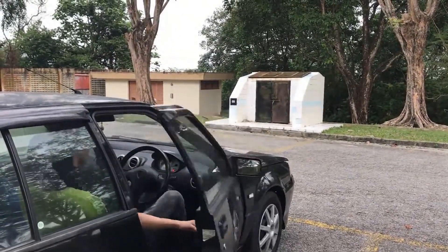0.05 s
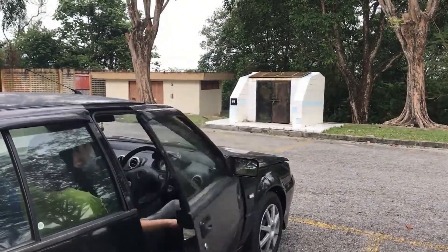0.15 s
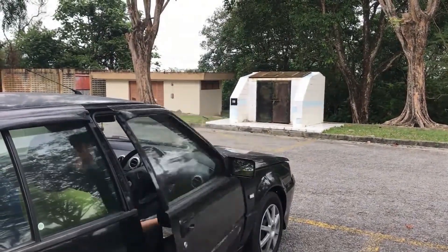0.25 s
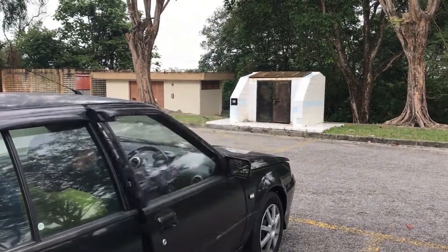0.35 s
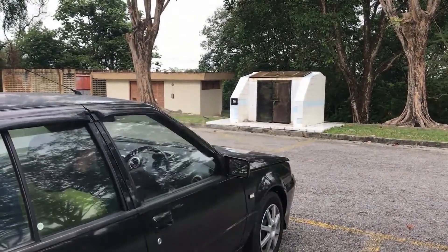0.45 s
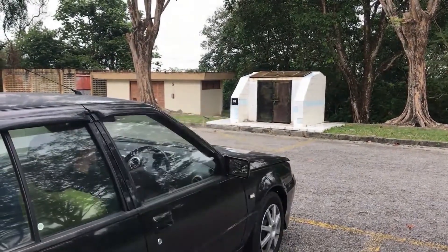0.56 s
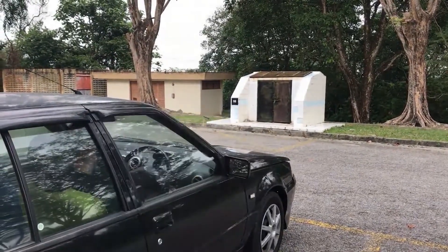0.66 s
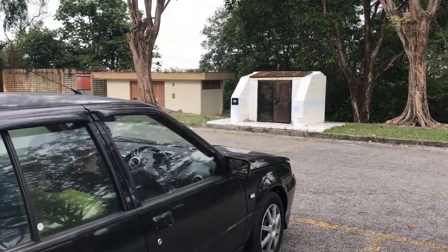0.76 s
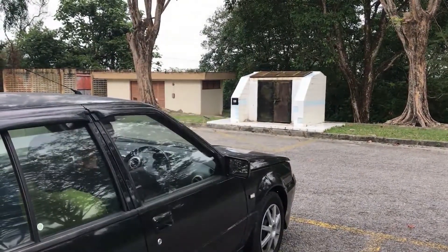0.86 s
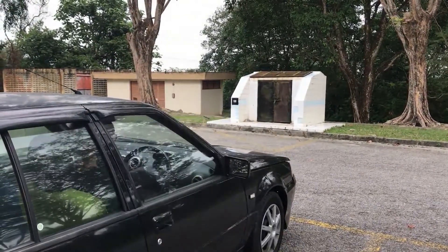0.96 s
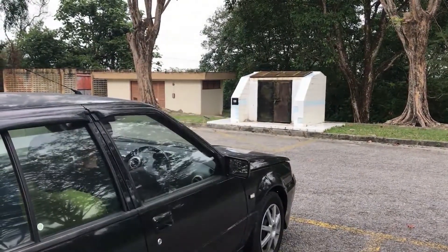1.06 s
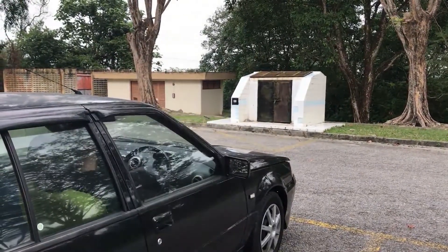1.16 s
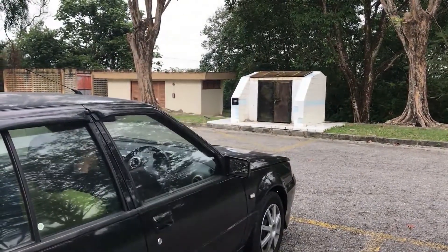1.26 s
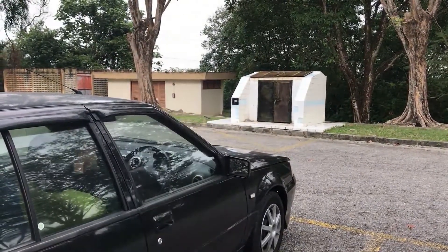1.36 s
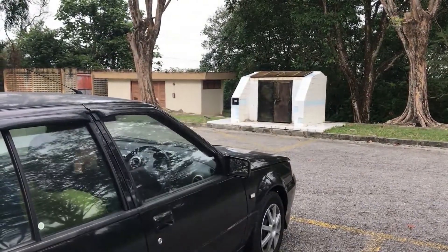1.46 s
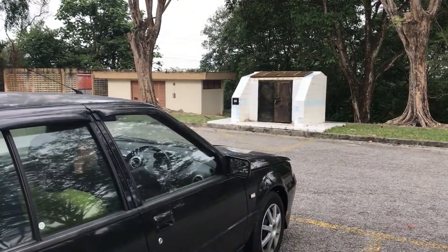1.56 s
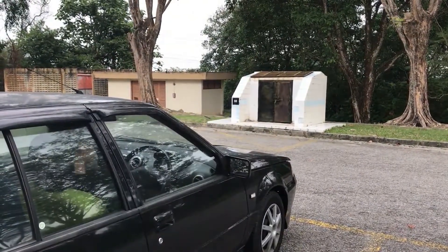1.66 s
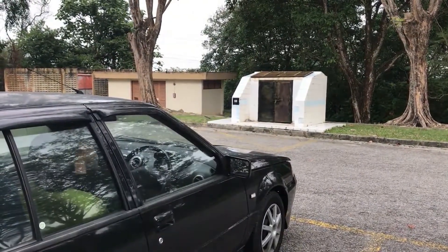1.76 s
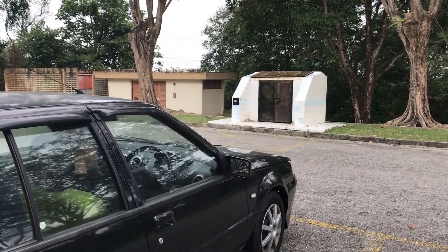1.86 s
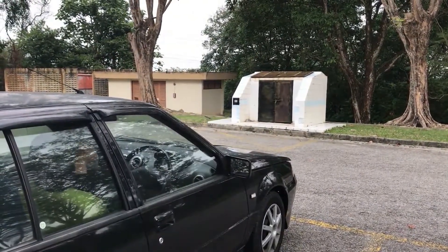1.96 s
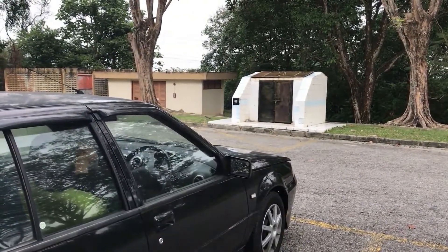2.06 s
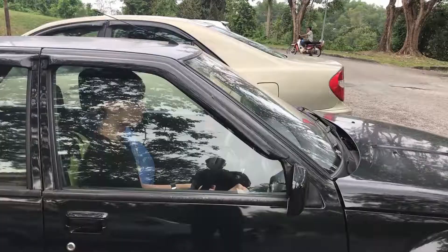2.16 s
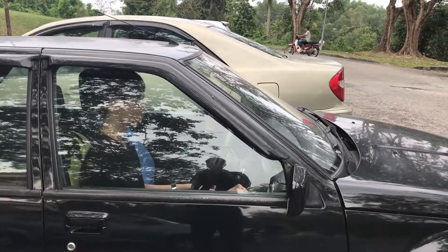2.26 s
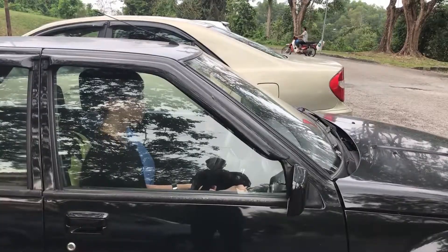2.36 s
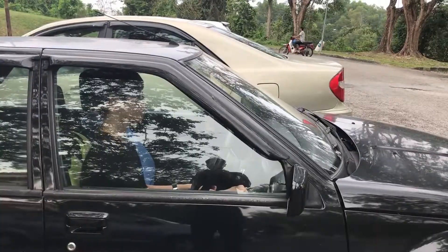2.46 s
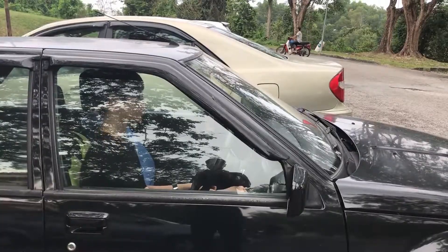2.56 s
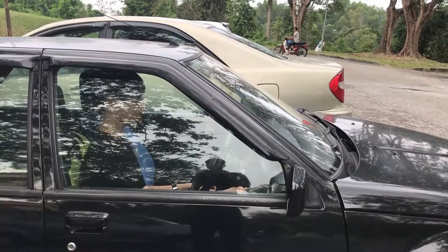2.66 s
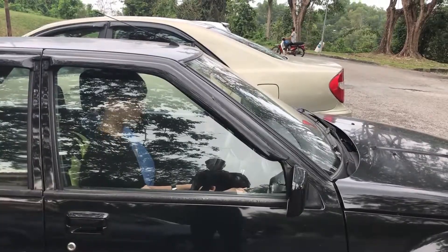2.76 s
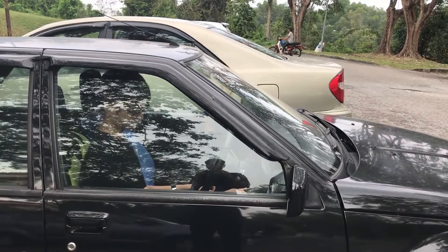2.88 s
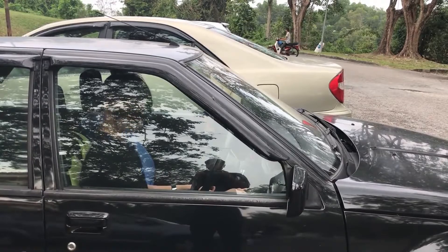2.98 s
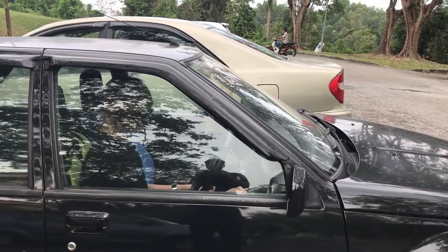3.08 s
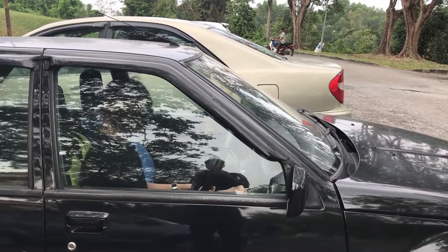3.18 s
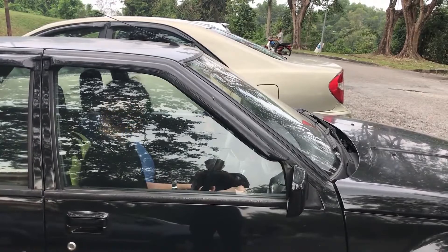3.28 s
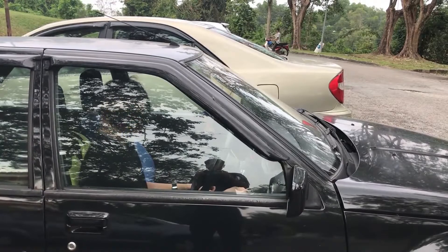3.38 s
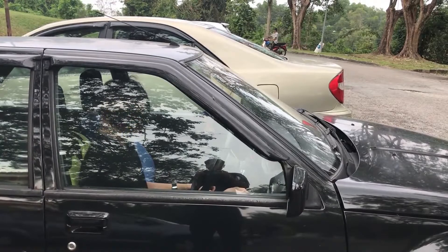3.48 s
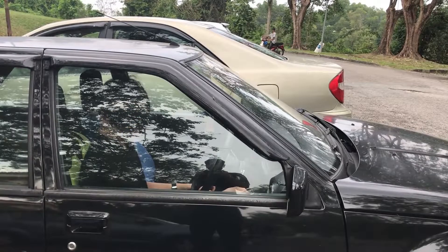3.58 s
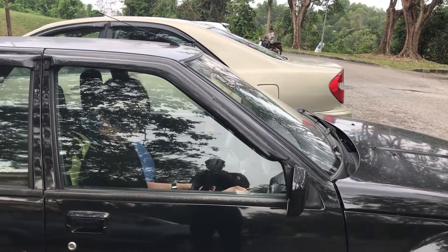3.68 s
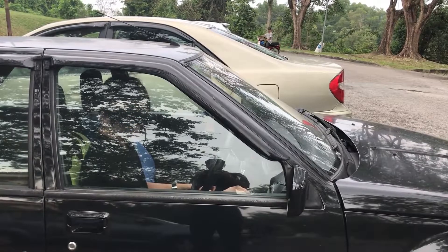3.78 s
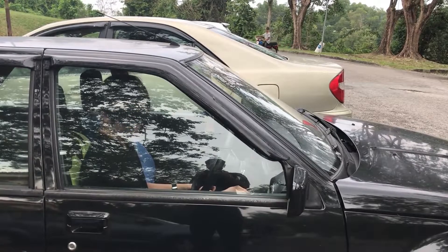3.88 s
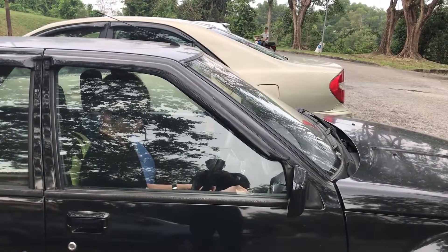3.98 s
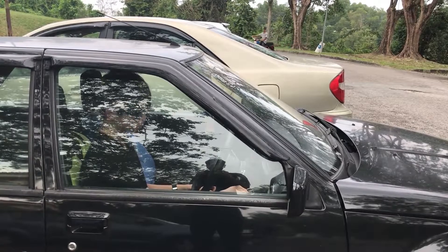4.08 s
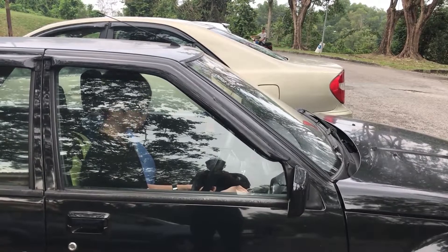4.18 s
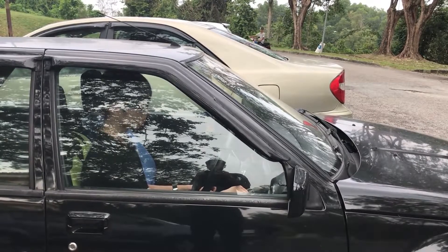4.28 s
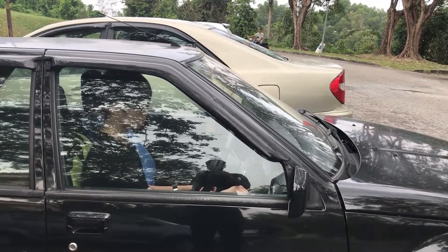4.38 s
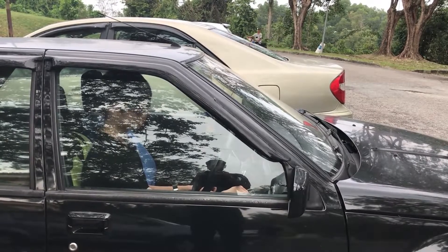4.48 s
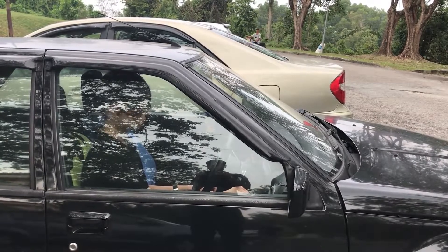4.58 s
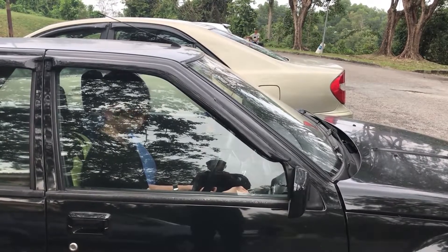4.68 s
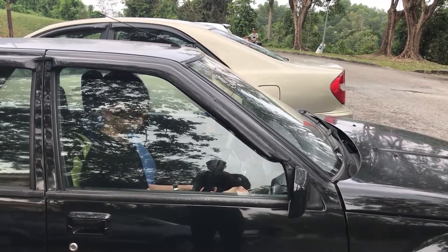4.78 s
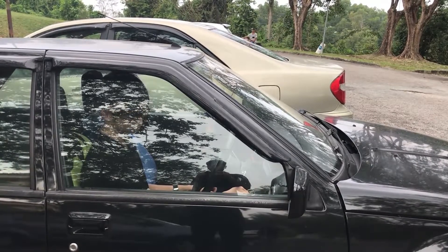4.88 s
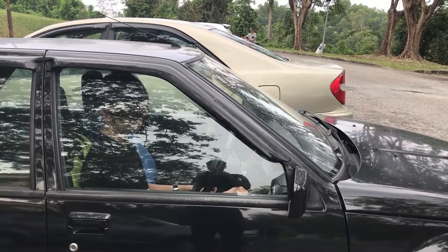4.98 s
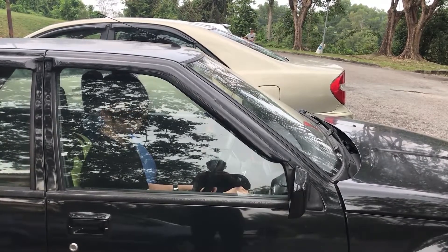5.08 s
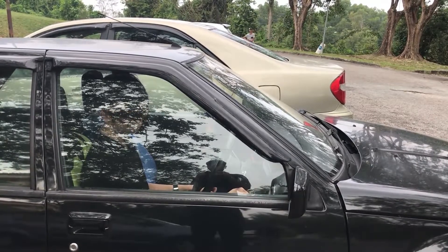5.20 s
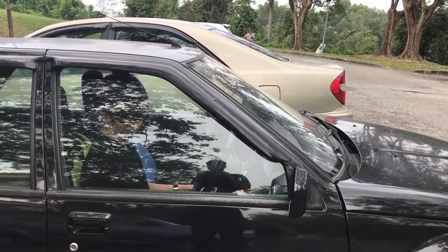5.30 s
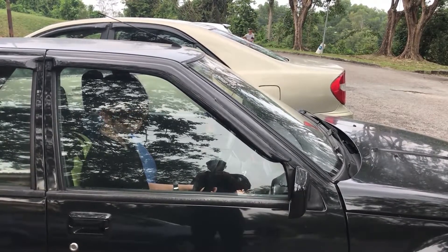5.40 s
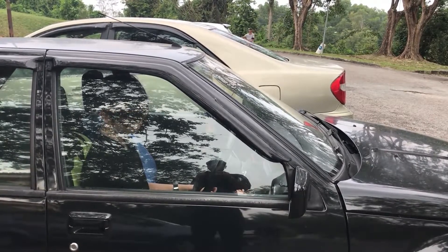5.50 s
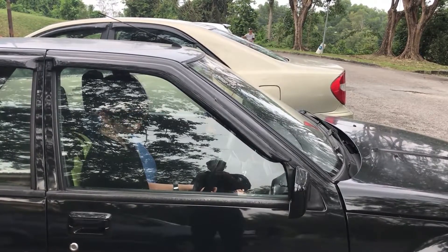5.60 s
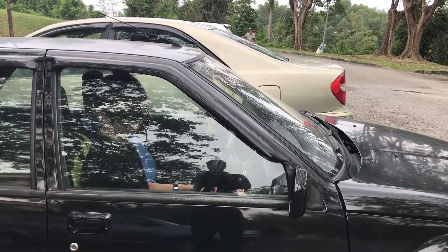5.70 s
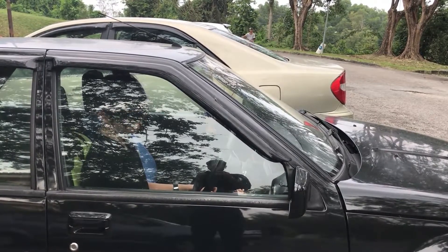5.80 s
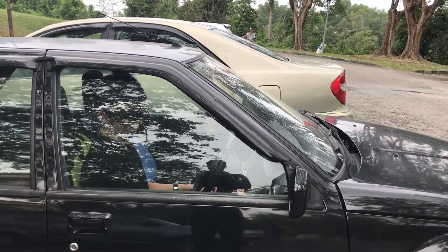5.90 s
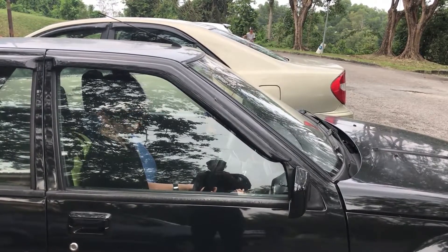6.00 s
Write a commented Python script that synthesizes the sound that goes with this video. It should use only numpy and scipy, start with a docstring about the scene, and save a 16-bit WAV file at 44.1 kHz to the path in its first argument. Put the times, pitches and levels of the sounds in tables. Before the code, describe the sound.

Close outdoor pickup beside a parked car, identical in both channels with little deep bass: one loud door slam early on, then a long quiet stretch of leaves, insects, chirping birds and a distant thudding motorcycle that revs and recedes. A thin electric pump hum and soft clicks come midway, and the starter finally engages with a clunk, gear whine and quickening exhaust thumps.

```python
"""A far motorcycle ticks over in thuds of a ringing silencer; a car door slams: metal crash, cabin boom, panel ring.
A breath of wind lifts the leaves (shaped noise) over traffic and insects; a bird chips in gliding tones.
The motorcycle revs, then idles while its rattle fades; the fuel pump whines, birds whistle and rasp, relays tick.
At last the starter clunks in and its gears whine over clatter and hiss; the engine catches in quickening thumps."""
import sys
import numpy as np
from scipy import signal
from scipy.fft import rfft, irfft, next_fast_len
from scipy.io import wavfile

SR = 44100
rng = np.random.default_rng(int(sys.argv[2]) if len(sys.argv) > 2 else 0)


def to_wav(s):
    """Save 16-bit WAV."""
    ch = np.atleast_2d(s).T  # columns
    pcm = np.round(np.clip(ch, -1, 1) * 32767)  # PCM
    wavfile.write(sys.argv[1], SR, pcm.astype(np.int16))


N = 266805

# Noise colours hold relative levels: the noise is scaled to unit rms before its level is set.
# Mode levels are relative to the hit that excites them; t60 is the time to fall by 60 dB.

# open air: (time [s], rumble level [dB], insect level [dB])
OPEN_AIR_LEVELS = [(0, -52, -74.3), (1.8, -51.7, -73.3), (2.4, -57, -75.5), (3.8, -54.7, -76),
                   (5.5, -55.8, -78)]
# colours of far rumble, traffic, leaves and insects: (frequency [Hz], relative density [dB])
RUMBLE_COLOUR = [(30, -13.5), (45, -3.5), (60, -1.5), (123, -5.5), (275, -15), (310, -23), (420, -28.5)]
TRAFFIC_COLOUR = [(300, -4), (540, -8), (780, -2.5), (1000, -6), (1300, -8), (2500, -18.5)]
LEAF_COLOUR = [(1500, -13.5), (2500, 3.5), (4000, 2.5), (5700, -4.5), (8000, -2.5), (10000, -10),
               (13000, -6), (15500, -8.5)]
INSECT_COLOUR = [(5800, -27), (6600, -1), (6900, 1), (7400, -13), (8600, -32.5)]
# tail scattered back by walls, trees and parked cars: (frequency [Hz], t60 [s])
YARD_TAIL_DECAY = [(150, 0.54), (600, 0.63), (2000, .42), (6000, 0.6), (14000, 0.59)]

# falling chips of one bird: (first [s], last [s], first [Hz], last [Hz], first [dB], last [dB])
CHIP_SERIES = (1.425, 2.118, 2890, 2780, -72, -68.5)
# slowly sinking trill of another: (first [s], last [s], first [Hz], last [Hz], first [dB], last [dB])
TRILL_SERIES = (3.168, 4.131, 3840, 3750, -58.5, -60)
# long whistle ahead of the trill: (start [s], length [s], target pitch [Hz], level [dB])
LONG_WHISTLE = (2.925, .175, 3940, -57.5)
# stray peeps: (start [s], target pitch [Hz], level [dB])
STRAY_PEEPS = [(3.805, 2190, -65.5), (3.875, 2170, -66.5), (4.412, 1920, -69), (4.555, 2910, -67),
               (4.638, 2330, -65), (4.67, 2880, -69), (4.75, 3410, -67.5), (4.82, 2850, -69),
               (4.9, 2800, -70)]
# glides within a note: (scoop up [Hz], scoop time constant [s], sag [Hz per s])
CHIP_GLIDE = (40, .01, 6000)
LONG_WHISTLE_GLIDE = (520, .026, 900)
TRILL_GLIDE = (720, .0105, 2300)
PEEP_GLIDE = (400, .008, 1500)
# raspy calls: (middle [s], half length [s], centre frequency [Hz], level [dB])
RASPY_CALLS = [(3.052, .045, 3160, -68), (3.08, .11, 4200, -77), (3.3, .12, 3100, -77),
               (3.516, .069, 3000, -68), (4.0, .22, 3200, -77), (4.37, .06, 4560, -78),
               (4.517, .06, 3930, -77.5), (4.66, .1, 2900, -77), (4.696, .04, 5500, -75),
               (5.205, .076, 7480, -66.5)]

# motorcycle silencer: (frequency [Hz], level [dB], t60 [s])
SILENCER_MODES = [(50, -14, 0.13), (80, 0, 0.17), (122, 4.5, 0.11), (160, 0, 0.12), (231.6, -8, 0.15),
                  (437, -22.5, 0.043)]
# motorcycle's mechanical noise: (frequency [Hz], relative density [dB])
RATTLE_COLOUR = [(150, 3), (260, 5), (400, -2.5), (600, -3.5), (690, -4), (765, 4), (900, -2), (1150, -1),
                 (1500, -6), (2300, -13), (3600, -15), (5200, -26), (8000, -24), (15000, -28.5)]

# fuel pump whine: (time [s], frequency [Hz], level [dB])
PUMP_WHINE = [(2.8, 1120, -90), (2.9, 1106, -72), (3.0, 1086, -66.5), (3.3, 1084, -68.5),
              (3.55, 1092, -69.5), (3.6, 1070, -93)]
# small knocks, key and relays: (time [s], level [dB], rise time constant [s], brightness [dB per octave])
CABIN_TICKS = [(.044, -58, .006, 0.5), (1.269, -63, 0.0018, 6), (2.209, -58.5, .0005, 0.5),
               (3.591, -52.5, 0.0011, -4.5), (3.665, -58.5, .003, -2), (3.688, -51, 0.0036, 18.5),
               (3.713, -52, .003, -4), (4.331, -63, .0005, -6)]
# colour of those ticks: (frequency [Hz], relative density [dB])
CABIN_TICK_COLOUR = [(250, -14), (800, 0.5), (1400, -1), (3000, -4.5), (6000, -10), (15000, -30)]
# their dying away: (frequency [Hz], t60 [s])
CABIN_TICK_DECAY = [(300, 0.17), (10000, 0.17)]
# a soft knock in the cabin: (time [s], level [dB])
SOFT_KNOCK = [(4.332, -49)]
# its body: (frequency [Hz], level [dB], t60 [s])
SOFT_KNOCK_MODES = [(400, -6, .03), (540, -2, .04)]

# colours of belts and valves, and of intake air: (frequency [Hz], relative density [dB])
CLATTER_COLOUR = [(180, 4), (460, -15), (620, -10.5), (770, -17.5), (1000, -2), (1200, -12.5), (1410, -4.5),
                  (1530, -11.5), (1800, -7.5), (2500, -20.5)]
INTAKE_COLOUR = [(1350, -39), (2300, -14), (2610, -11), (3320, 2.5), (4390, -5), (4720, -2), (4910, -7.5),
                 (6140, -3), (7680, -17.5), (8860, -10.5), (10200, -19), (11500, -16), (15500, -27)]
# car exhaust: (frequency [Hz], level [dB], t60 [s])
EXHAUST_MODES = [(42, -20, 0.13), (82, 1.5, 0.12), (113, -2, 0.11), (160, -21, 0.14)]
# unfired cylinders pump air into the exhaust: (time [s], level [dB])
AIR_PUFFS = [(5.686, -39), (5.792, -40)]

# solenoid, pinion meshing and pinion thrown out:
# (time [s], level [dB], rise time constant [s], brightness [dB per octave], ring of the part [Hz])
STARTER_CLUNKS = [(5.524, -35.5, .006, -0.5, 1103), (5.5806, -33.5, 0.00027, 0.5, 11700),
                  (5.597, -27.5, 0.0045, -1, 1013), (5.608, -36, 0.0024, -5.5, 354),
                  (5.804, -31, 0.0015, 1, 7160), (5.815, -35, 0.0023, 2, 1000)]
# colour of the clunks: (frequency [Hz], relative density [dB])
CLUNK_COLOUR = [(88, -43), (150, -9), (308, -3.5), (540, -27), (1040, 1.5), (1320, -6), (1630, -7.5),
                (1800, -5), (2810, -11.5), (3220, -3.5), (4840, -10.5), (7270, -13), (8170, -18.5),
                (13500, -22), (15500, -29)]
# their dying away: (frequency [Hz], t60 [s])
CLUNK_DECAY = [(250, 0.28), (1000, 0.16), (4000, 0.12), (12000, 0.12)]
# starter housing: (frequency [Hz], level [dB], t60 [s])
HOUSING_MODES = [(73, -9, 0.15), (242, -7.5, 0.15), (750, -15, 0.18), (1105, -9, 0.092), (3380, -14, .06),
                 (5400, -7, 0.054)]
# starter motor: (time [s], gear mesh frequency [Hz], level [dB])
GEAR_MESH = [(5.59, 268, -85), (5.62, 272.3, -46), (5.66, 276.3, -41.5), (5.70, 280.6, -36.3),
             (5.74, 273.2, -47), (5.79, 267, -49), (5.85, 287.2, -46), (6.05, 304.3, -50.5)]
# partials of the gear whine: (multiple of mesh frequency, level [dB])
GEAR_PARTIALS = [(1, -5), (2, -10.5), (2.65, -10.5), (4.05, -10), (5, -3.5), (10.4, -10), (14.2, -9),
                 (18.6, -9.5)]

# latch and door frame meeting the body:
# (time [s], level [dB], rise time constant [s], brightness [dB per octave])
LATCH_HITS = [(.5558, -20.5, 0.0025, 0), (.567, -24.5, .001, 1.5), (.572, -21, .001, 0.5),
              (.5785, -20.5, .001, 0), (.592, -27, .003, 0.1), (.611, -36.5, .002, -4),
              (.634, -37.5, .001, -1.5)]
# colour of the latch crash: (frequency [Hz], relative density [dB])
LATCH_COLOUR = [(150, -1), (200, -12.5), (260, -4.5), (450, -9.5), (740, -9), (930, -17), (1120, -3),
                (1350, -9), (2230, -10), (2550, -15), (5230, -19), (7860, -25.5), (9000, -23),
                (15500, -26.5)]
# its dying away: (frequency [Hz], t60 [s])
LATCH_DECAY = [(200, 0.33), (700, 0.15), (2000, 0.1), (6000, 0.12), (14000, 0.057)]
# latch and window frame: (frequency [Hz], level [dB], t60 [s])
LATCH_MODES = [(649, -17, 0.15), (1069, -10, .13), (1129, -17, .13), (1236, -14, 0.27), (1277, -3.5, .12),
               (1480, -14, 0.27), (1536, -11.5, .11), (1624, -17, .11), (1977, -23, 0.066),
               (2156, -10.5, .09)]
# the seal stops the door and the cabin air is squeezed: (time [s], level [dB])
AIR_PUSHES = [(.577, -23), (.592, -11.5)]
# cabin air and ringing body panels: (frequency [Hz], level [dB], t60 [s])
CABIN_MODES = [(46.6, -8.5, 0.43), (80, -0.5, 0.18), (120, -4.5, 0.038), (153.6, -13.5, .2)]
PANEL_MODES = [(260, -22.5, 0.82), (431, -31, .75), (463, -37, 1.8), (536, -36, 1.36), (733, -32.5, 1.27),
               (780, -33, 0.9), (870, -33.5, .8), (910, -35, .8)]

# a breath of wind lifts the leaves and the traffic noise
TRAFFIC_DB, LEAVES_DB = -71.3, -74.6
GUST_S, GUST_HALF_S, GUST_LEAVES_DB, GUST_TRAFFIC_DB = 1.56, .22, 5.5, 5
# birds: note counts and lengths, wavering of pitch and level, one reflection of the trill
CHIP_COUNT, CHIP_S, TRILL_COUNT, TRILL_NOTE_S, PEEP_S = 9, .048, 8, .056, .032
FLUTTER_PER_S, FLUTTER_HZ, FLUTTER_DB = 150, 16, 1.5
WALL_ECHO_S, WALL_ECHO_DB = .056, -14
RASP_HALF_WIDTH_HZ = 450
# motorcycle: ticks over, is suddenly heard revving, then settles to idle and rolls away
TICKOVER_START_S, REV_START_S, REV_END_S, SETTLE_S = .046, 2.217, 2.643, .165
TICKOVER_PER_S, REV_PER_S, IDLE_PER_S = 13.05, 16.45, 11.5  # firings a second
TICKOVER_DB, IDLE_DB, REV_GAIN_DB = -48.8, -51.8, 5.3  # thud strength ahead of the distance filter
RATTLE_DB, RATTLE_REV_GAIN_DB, RECEDE_DB_PER_S = -61.3, 4, 4.3
# engine noise while cranked and once it runs by itself
CRANKING_CLATTER_DB, CRANKING_HISS_DB = -43, -41.5
RUNNING_CLATTER_DB, RUNNING_HISS_DB = -38.3, -37
SPIN_UP_S = .15  # the intake draws air ever harder after the starter engages
COMPRESSION_S, COMPRESSION_HALF_S, COMPRESSION_DIP_DB = 5.785, .025, 4  # first compression stroke
CATCH_S, CATCH_RISE_S = 5.8605, .03  # first firing; the running noise comes up just ahead of it
CATCH_PER_S, REV_UP_PER_S2, FIRING_COUNT = 22.4, 98, 6  # firing rate at the catch, its acceleration
FLARE_S, FLARE_DB, FLARE_FALL_DB_PER_S = 5.93, -23.5, 60  # firings peak here, weaker before and after
PIPE_ECHO_S, PIPE_ECHO_DB = .014, -10  # each kick comes back from the end of the pipe
BASS_CUT_HZ, TOP_CUT_HZ = 38, 15850


def from_db(db):
    """Decibels to gain."""
    return 10 ** (np.asarray(db) / 20)


def rms_one(x):
    """Scale to unit rms."""
    return x / np.sqrt(np.mean(x ** 2) + 1e-20)


def in_time(rows):
    """Each column of a curve, sample by sample."""
    s, *columns = np.transpose(rows)
    return [np.interp(np.arange(N) / SR, s, column) for column in columns]


def at_hz(points, hz):
    """Read a table on a log-frequency axis."""
    known_hz, values = np.transpose(points)
    return np.interp(np.log(hz), np.log(known_hz), values)


def drift(rate):
    """Random wander of unit rms, drawn at so many points a second and joined by straight lines."""
    points = rng.standard_normal(N // 10)
    return rms_one(np.interp(np.arange(N) / SR * rate, np.arange(N // 10), points))


def swell(middle_s, half_s):
    """A smooth bell-shaped rise to 1 and fall again."""
    return np.exp(-((np.arange(N) / SR - middle_s) / half_s) ** 2)


def noise(colour):
    """Noise of rms 1 with the given colour, falling steeply beyond its ends."""
    size = next_fast_len(N)
    hz = np.maximum(np.fft.rfftfreq(size, 1 / SR), 1)
    low_skirt = np.minimum(hz / colour[0][0], 1) ** 4
    high_skirt = np.minimum(colour[-1][0] / hz, 1) ** 6
    white = rfft(rng.standard_normal(size))
    return rms_one(irfft(white * from_db(at_hz(colour, hz)) * low_skirt * high_skirt, size)[:N])


def struck(hits, modes, scatter_db):
    """Every hit sets decaying modes ringing, each with a randomly scattered strength."""
    out, t = np.zeros(N + SR), np.arange(SR) / SR
    hz, mode_db, t60 = np.transpose(modes)
    rings = np.sin(2 * np.pi * hz[:, None] * t) * from_db(-60 * t / t60[:, None])
    for s, db, *_ in hits:
        at = int(s * SR)
        strength_db = db + mode_db + scatter_db * rng.standard_normal(len(hz))
        out[at:at + SR] += from_db(strength_db) @ rings
    return out[:N]


def dying_noise(colour, decay):
    """One second of noise scaled to rms 1, then split into 12 bands that each die at their own rate."""
    t, hz = np.arange(SR) / SR, np.maximum(np.arange(SR // 2 + 1), 1)
    spectrum = rfft(rng.standard_normal(SR)) * colour(hz)
    spectrum /= np.std(irfft(spectrum, SR))
    edges = np.geomspace(60, 17000, 13)
    out = np.zeros(SR)
    for low, high in zip(edges, edges[1:]):
        band = irfft(spectrum * (hz >= low) * (hz < high), SR)
        out += band * from_db(-60 * t / at_hz(decay, np.sqrt(low * high)))
    return out


def crashes(hits, colour, decay, grain_db):
    """Contacts of loose metal parts: each swells, rattles and dies away as noise."""
    out, t = np.zeros(N + SR), np.arange(SR) / SR
    for s, db, rise, tilt, *_ in hits:
        burst = dying_noise(lambda hz: from_db(at_hz(colour, hz) + tilt * np.log2(hz)) * (hz > 100), decay)
        at = int(s * SR)
        lead = min(at, SR // 20)
        out[at:at + SR] += from_db(db) * burst
        # the swell ahead of the hit is the burst's opening, mirrored
        mirrored = (burst[:lead] * np.exp(-t[:lead] / abs(rise)))[::-1]
        out[at - lead:at] += from_db(db) * mirrored
    return out[:N] * from_db(grain_db * drift(900))


def echoed(x, lag_s, echo_db):
    """A sound with one delayed, scaled reflection."""
    t = np.arange(N) / SR
    return x + from_db(echo_db) * np.interp(t - lag_s, t, x)


def yard(x, wet_db, dull_hz):
    """Walls, trees and parked cars scatter a dull tail back, by convolution with dying noise."""
    build_up = 1 - np.exp(-np.arange(SR) / SR / .015)
    tail = dying_noise(lambda hz: 1 / np.hypot(1, hz / dull_hz), YARD_TAIL_DECAY) * build_up
    return x + from_db(wet_db) * signal.fftconvolve(x, tail / np.linalg.norm(tail))[:N]


def outdoors():
    """Broad noise bands for distant traffic, leaves stirred by one gust, and insects."""
    rumble_db, insects_db = in_time(OPEN_AIR_LEVELS)
    gust = swell(GUST_S, GUST_HALF_S)
    traffic_db = TRAFFIC_DB + GUST_TRAFFIC_DB * gust + 0.61 * drift(60)
    rumble = from_db(rumble_db) * noise(RUMBLE_COLOUR)
    traffic = from_db(traffic_db) * noise(TRAFFIC_COLOUR)
    leaves = from_db(LEAVES_DB + GUST_LEAVES_DB * gust) * noise(LEAF_COLOUR)
    insects = from_db(insects_db + 0.67 * drift(30)) * noise(INSECT_COLOUR)
    return rumble + traffic + leaves + insects


def whistles(notes, glide):
    """Each note (start, length, pitch, level) is a sine that scoops up, then sags, wavering a little."""
    out = np.zeros(N)
    scoop_hz, scoop_s, sag_hz_per_s = glide
    flutter = FLUTTER_HZ * drift(FLUTTER_PER_S)
    for s, length, top_hz, db in notes:
        t = np.arange(int(length * SR)) / SR
        span = slice(int(s * SR), int(s * SR) + len(t))
        hz = top_hz - scoop_hz * np.exp(-t / scoop_s) - sag_hz_per_s * t + flutter[span]
        tone = np.sin(2 * np.pi * np.cumsum(hz) / SR)
        out[span] += from_db(db) * np.sin(np.pi * t / length) * tone
    return out * from_db(FLUTTER_DB * drift(FLUTTER_PER_S))


def even_run(run, length_s, count):
    """Evenly spaced notes whose pitch and level slide from the first to the last."""
    s, hz, db = (np.linspace(first, last, count) for first, last in zip(run[::2], run[1::2]))
    return zip(s, np.full(count, length_s), hz, db)


def rasps():
    """Raspy calls: swelling bursts of noise in a narrow band."""
    out, t = np.zeros(N), np.arange(N) / SR
    for s, half, hz, db in RASPY_CALLS:
        near = abs(t - s) < 4 * half
        edges = [hz - RASP_HALF_WIDTH_HZ, hz + RASP_HALF_WIDTH_HZ]
        band = signal.butter(3, edges, "band", fs=SR, output="sos")
        rasp = rms_one(signal.sosfilt(band, rng.standard_normal(N)[near]))
        out[near] += from_db(db) * swell(s, half)[near] * rasp
    return out


def birds():
    """Gliding tones make chips, a trill and stray peeps among the trees; noise bursts make rasps."""
    chips = whistles(even_run(CHIP_SERIES, CHIP_S, CHIP_COUNT), CHIP_GLIDE)
    trill = whistles([LONG_WHISTLE], LONG_WHISTLE_GLIDE)
    trill = trill + whistles(even_run(TRILL_SERIES, TRILL_NOTE_S, TRILL_COUNT), TRILL_GLIDE)
    peeps = whistles([(s, PEEP_S, hz, db) for s, hz, db in STRAY_PEEPS], PEEP_GLIDE)
    wetter = yard(echoed(trill, WALL_ECHO_S, WALL_ECHO_DB) + rasps(), wet_db=-5, dull_hz=5000)
    return wetter + yard(chips + peeps, wet_db=-8, dull_hz=5000)


def motorcycle():
    """One cylinder thuds in its silencer; the throttle raises rate, strength and rattle together."""
    t = np.arange(N) / SR
    riding = t >= REV_START_S
    throttle = riding * np.exp(-np.maximum(t - REV_END_S, 0) / SETTLE_S)
    rate = IDLE_PER_S + (REV_PER_S - IDLE_PER_S) * throttle
    cycles = np.cumsum(rate[riding]) / SR
    ticking = np.arange(TICKOVER_START_S, REV_START_S - 1 / TICKOVER_PER_S, 1 / TICKOVER_PER_S)
    # one firing each time the cycle count passes a whole number
    fired = np.append(ticking, np.interp(np.arange(cycles[-1]), cycles, t[riding]))
    thud_db = np.where(riding, IDLE_DB + REV_GAIN_DB * throttle, TICKOVER_DB)
    thuds = struck(zip(fired, np.interp(fired, t, thud_db)), SILENCER_MODES, scatter_db=2.0)
    # distance rounds the thuds off and takes their depth
    distance = signal.butter(2, (62, 330), "band", fs=SR, output="sos")
    thuds = signal.sosfilt(distance, thuds)
    # each firing also lets out a short puff of gas
    since_firing = abs(t - fired[np.searchsorted(fired, t) - 1])
    puffs = rms_one(1 + .75 * np.exp(-since_firing / 0.0068))
    rattle_db = RATTLE_DB + RATTLE_REV_GAIN_DB * throttle - RECEDE_DB_PER_S * (t - REV_START_S)
    rattle = from_db(rattle_db + .6 * drift(60)) * noise(RATTLE_COLOUR)
    return thuds + riding * puffs * rattle


def ignition():
    """Key and relays tick as noise bursts; the fuel pump whines as a wavering sine."""
    hz, db = in_time(PUMP_WHINE)
    phase = 2 * np.pi * np.cumsum(hz * (1 + 0.0072 * drift(60))) / SR
    pump = from_db(db + 1.6 * drift(40)) * np.sqrt(2) * np.sin(phase)
    ticks = crashes(CABIN_TICKS, CABIN_TICK_COLOUR, CABIN_TICK_DECAY, grain_db=2.0)
    return pump + ticks + struck(SOFT_KNOCK, SOFT_KNOCK_MODES, scatter_db=1)


def engine():
    """Firings ring the exhaust ever faster, over noise for valve clatter and intake hiss."""
    t, engage_s = np.arange(N) / SR, GEAR_MESH[0][0]
    caught = np.clip(1 + (t - CATCH_S) / CATCH_RISE_S, 0, 1)
    load_db = COMPRESSION_DIP_DB * swell(COMPRESSION_S, COMPRESSION_HALF_S)
    clatter_db = CRANKING_CLATTER_DB + (RUNNING_CLATTER_DB - CRANKING_CLATTER_DB) * caught - load_db
    hiss_db = CRANKING_HISS_DB + (RUNNING_HISS_DB - CRANKING_HISS_DB) * caught - load_db
    unevenness = from_db(0.77 * drift(350))  # tappets and belts chatter unevenly
    clatter = (t > engage_s) * from_db(clatter_db + 1.25 * drift(100)) * noise(CLATTER_COLOUR)
    spin_up = np.clip((t - engage_s) / SPIN_UP_S, 0, 1)
    hiss = spin_up * from_db(hiss_db + 0.98 * drift(110)) * noise(INTAKE_COLOUR)
    # firing times under steady acceleration
    rates = np.sqrt(CATCH_PER_S ** 2 + 2 * REV_UP_PER_S2 * np.arange(FIRING_COUNT))
    fired = CATCH_S + (rates - CATCH_PER_S) / REV_UP_PER_S2
    fired_db = FLARE_DB - FLARE_FALL_DB_PER_S * abs(fired - FLARE_S)
    exhaust = struck(zip(fired, fired_db), EXHAUST_MODES, scatter_db=1)
    puffs = struck(AIR_PUFFS, EXHAUST_MODES, scatter_db=1)
    return unevenness * (clatter + hiss) + echoed(exhaust + puffs, PIPE_ECHO_S, PIPE_ECHO_DB)


def starter():
    """The solenoid throws the pinion in; partials of the gear mesh whine under the changing load."""
    mesh_hz, db = in_time(GEAR_MESH)
    backlash = .012 * drift(300)
    phase = 2 * np.pi * np.cumsum(mesh_hz * (1 + backlash)) / SR
    whine = sum(from_db(level + 2.2 * drift(120)) * np.sin(k * phase) for k, level in GEAR_PARTIALS)
    clunks = crashes(STARTER_CLUNKS, CLUNK_COLOUR, CLUNK_DECAY, grain_db=0.5)
    housing = struck(STARTER_CLUNKS, HOUSING_MODES, scatter_db=1.5)
    rings = np.zeros(N)
    for s, level, _, _, hz in STARTER_CLUNKS:
        rings += struck([(s, level)], [(hz, -5, .07)], scatter_db=1.5)
    return clunks + housing + rings + from_db(db) * whine


def door():
    """The latch crashes shut, squeezed air booms in the cabin and the panels ring on."""
    crash = crashes(LATCH_HITS, LATCH_COLOUR, LATCH_DECAY, grain_db=1.5)
    latch = crash + from_db(-6) * struck(LATCH_HITS, LATCH_MODES, scatter_db=0.5)
    boom = struck(AIR_PUSHES, CABIN_MODES, scatter_db=1.5)
    panels = from_db(9) * struck(AIR_PUSHES[:1], PANEL_MODES, scatter_db=2)
    return yard(latch, wet_db=-21, dull_hz=1600) + boom + panels


def scene():
    """Everything reaches both channels alike."""
    mono = outdoors() + birds() + motorcycle() + ignition() + engine() + starter() + door()
    return np.array([mono, mono])


def record(dry):
    """The small microphone loses the deepest bass; the top is cut steeply."""
    bass_cut = signal.butter(2, BASS_CUT_HZ, "high", fs=SR, output="sos")
    top_cut = signal.ellip(10, .2, 80, TOP_CUT_HZ, fs=SR, output="sos")
    return signal.sosfilt(top_cut, signal.sosfilt(bass_cut, dry))


dry = scene()
out = record(dry)
to_wav(out)
```